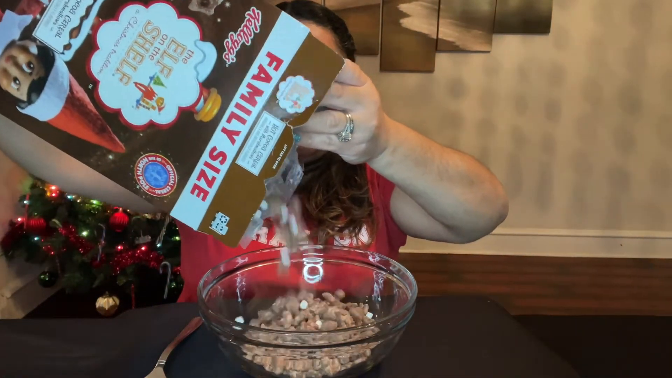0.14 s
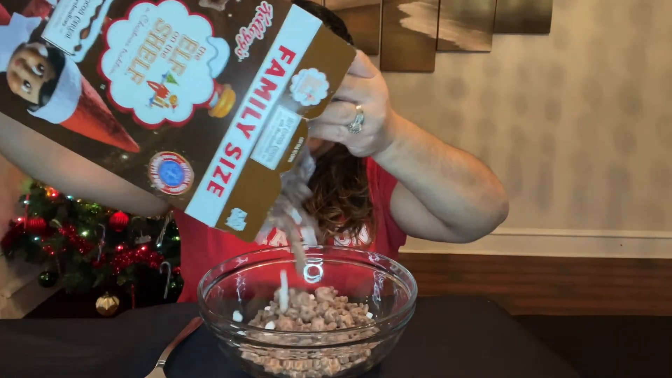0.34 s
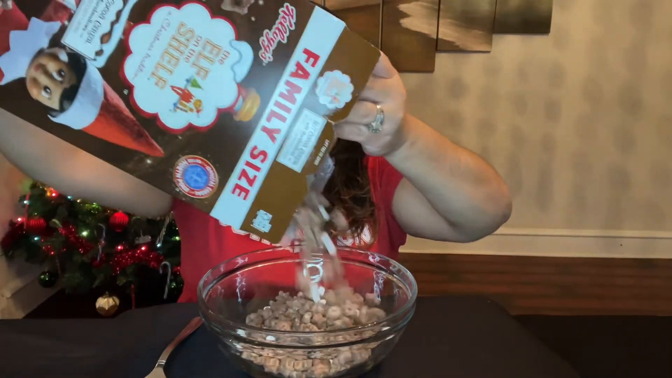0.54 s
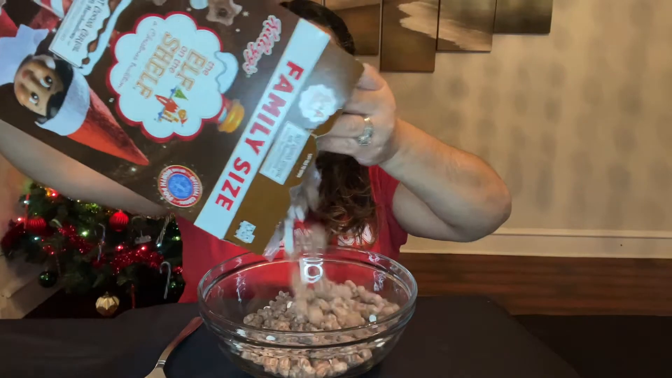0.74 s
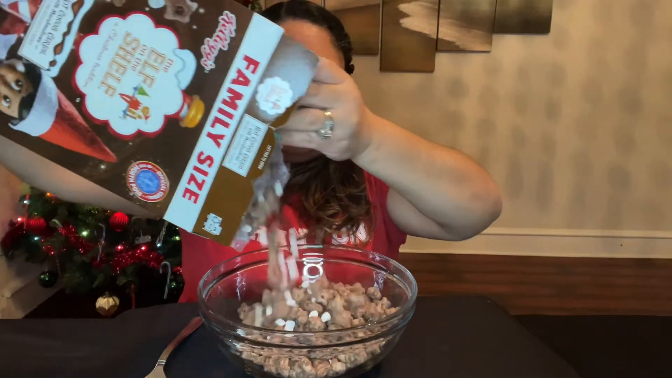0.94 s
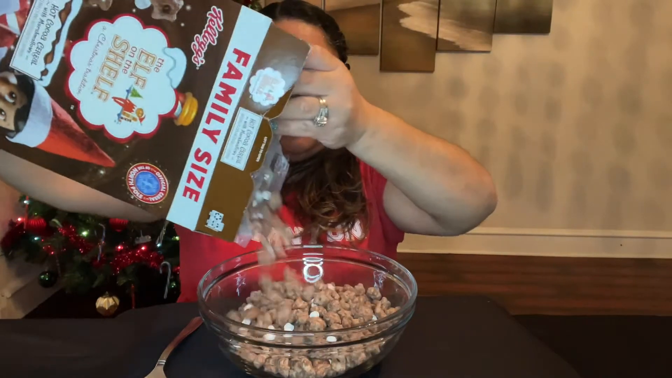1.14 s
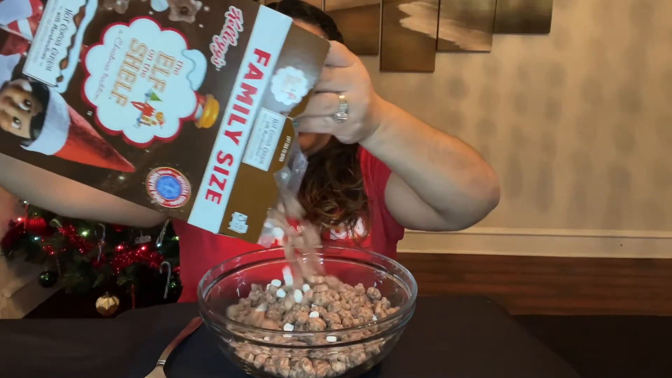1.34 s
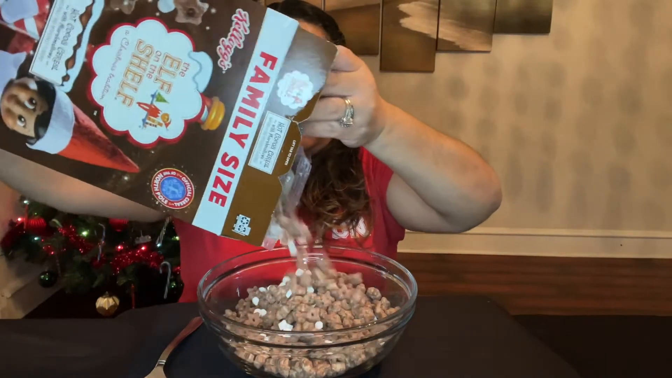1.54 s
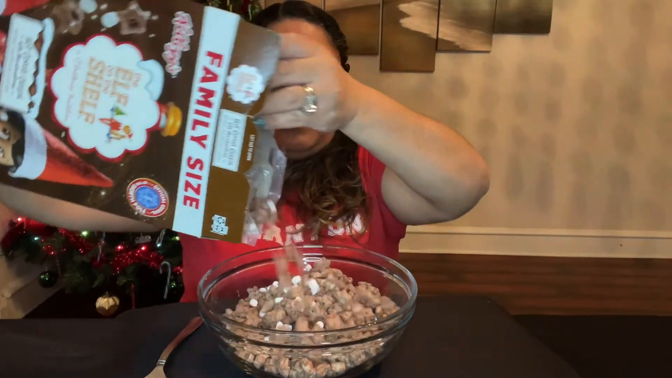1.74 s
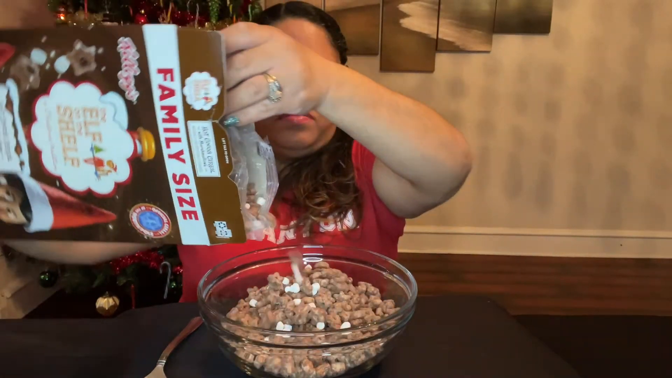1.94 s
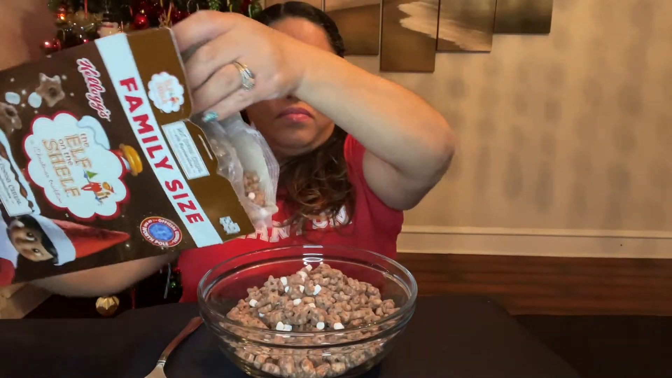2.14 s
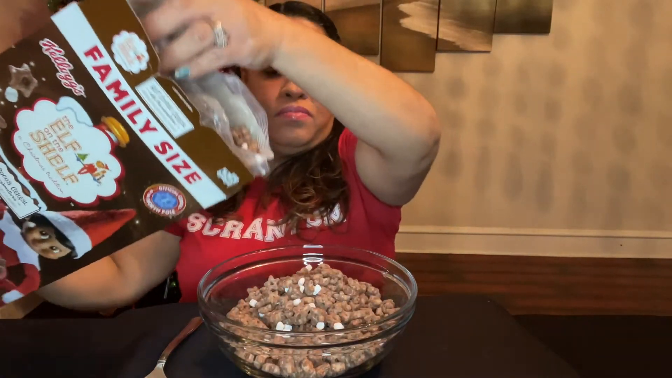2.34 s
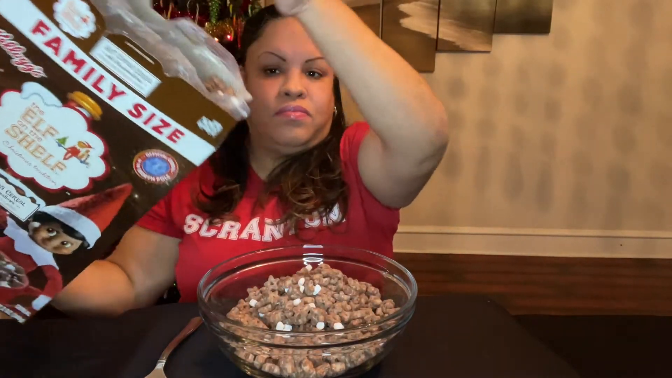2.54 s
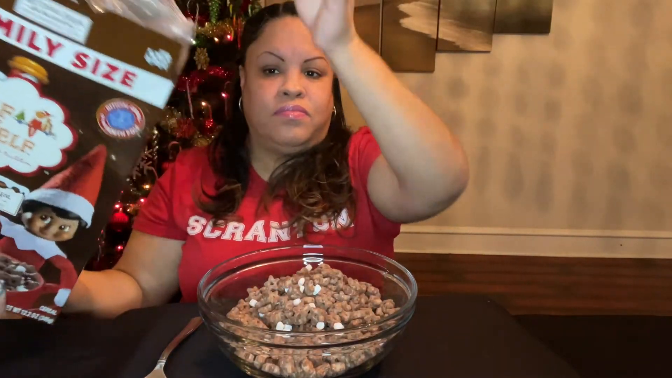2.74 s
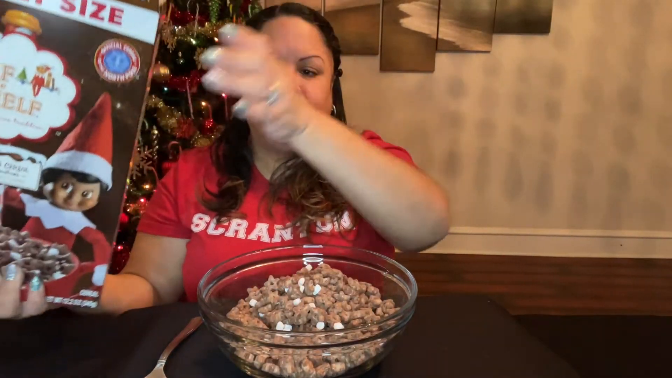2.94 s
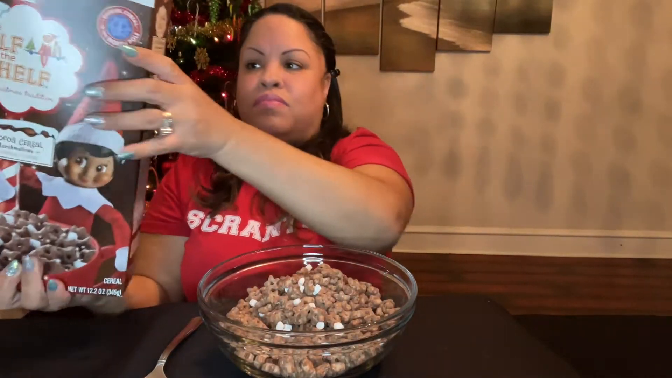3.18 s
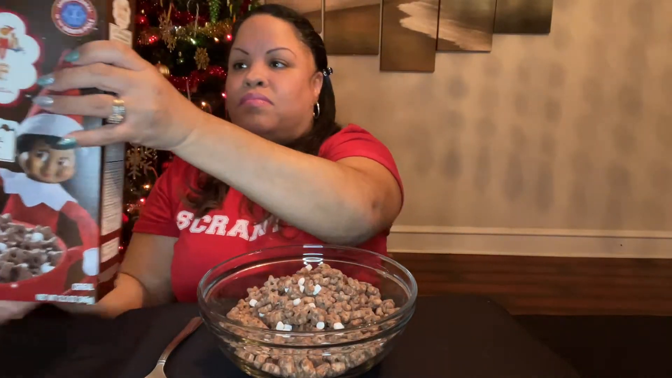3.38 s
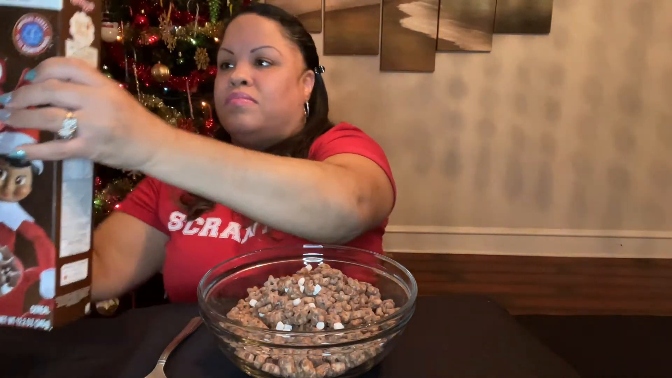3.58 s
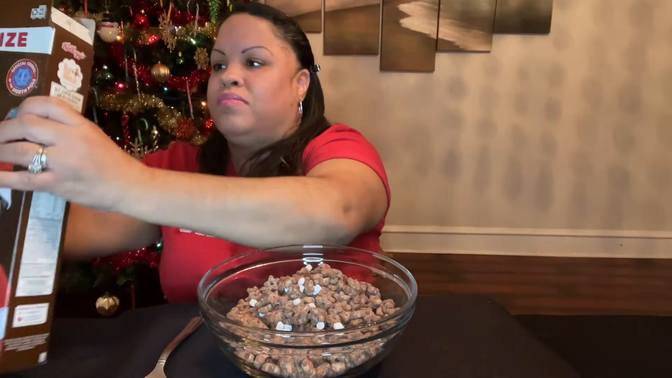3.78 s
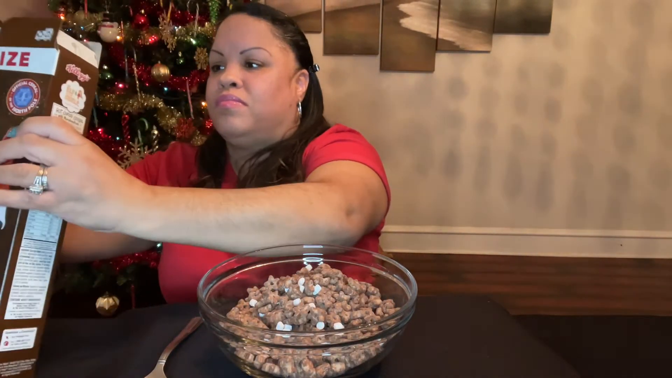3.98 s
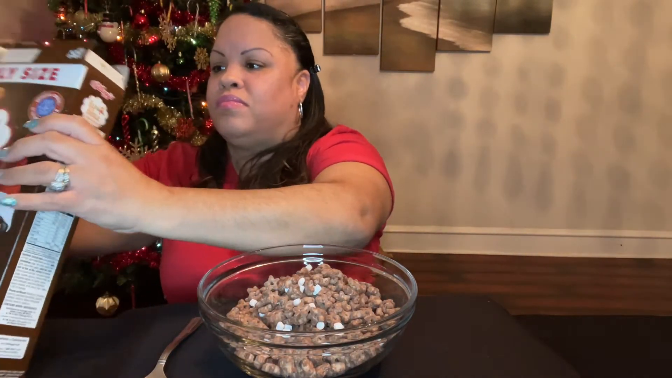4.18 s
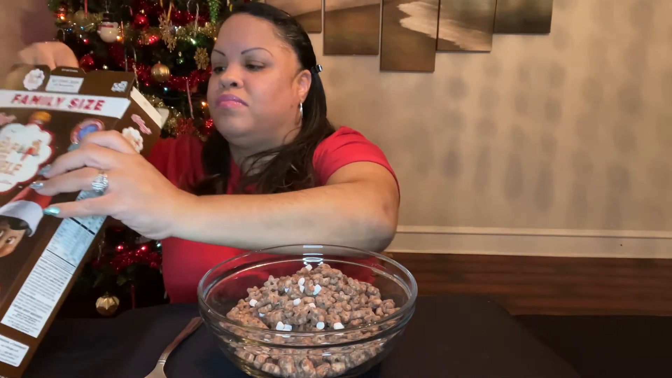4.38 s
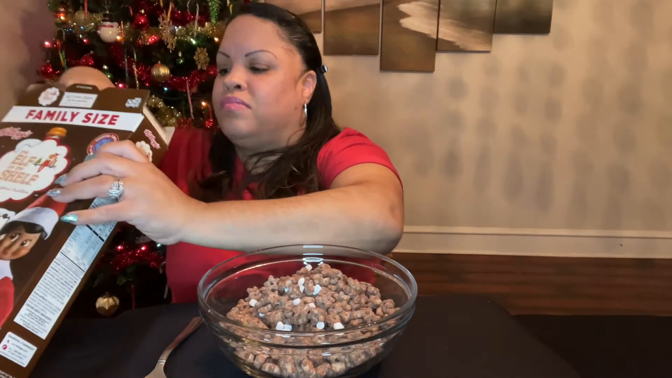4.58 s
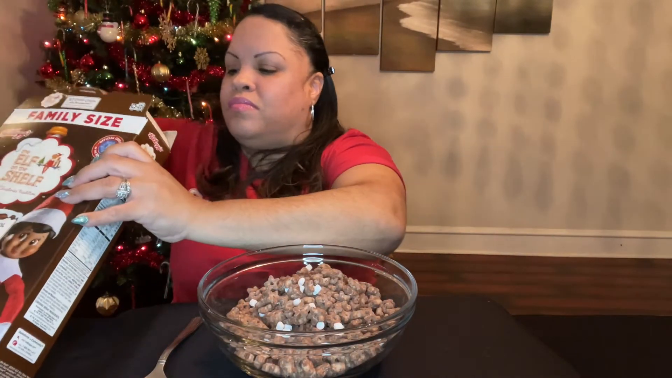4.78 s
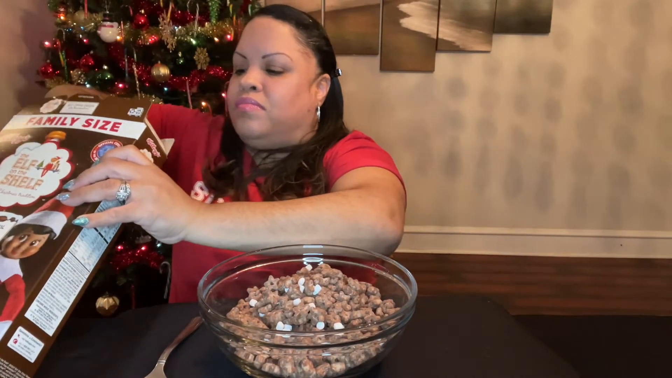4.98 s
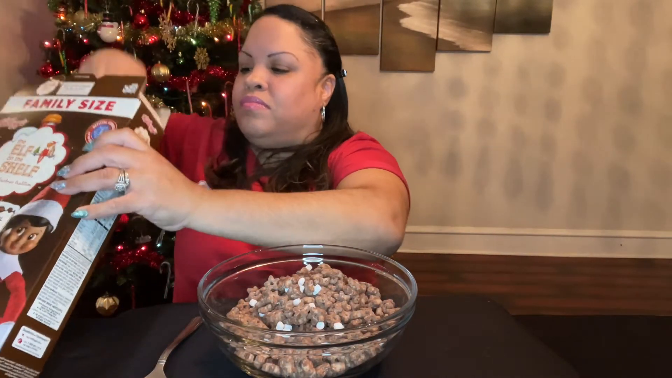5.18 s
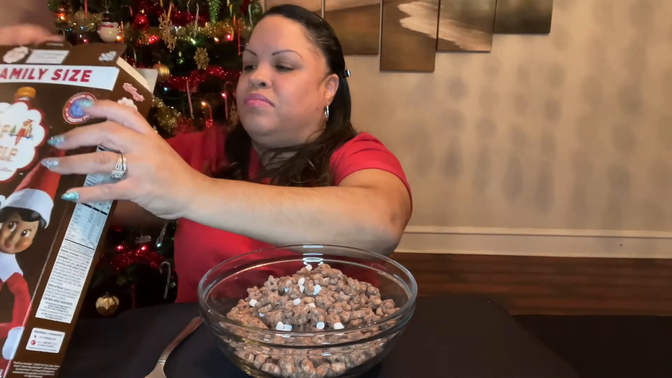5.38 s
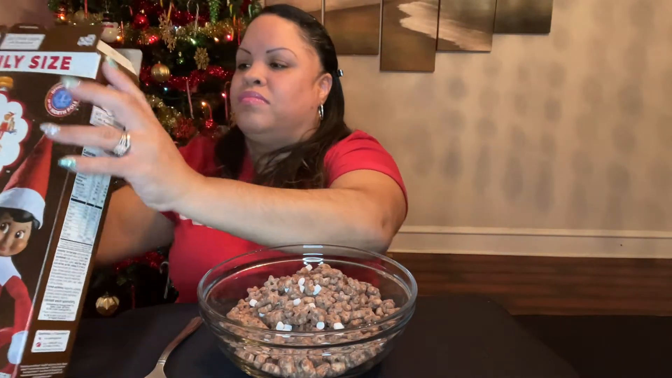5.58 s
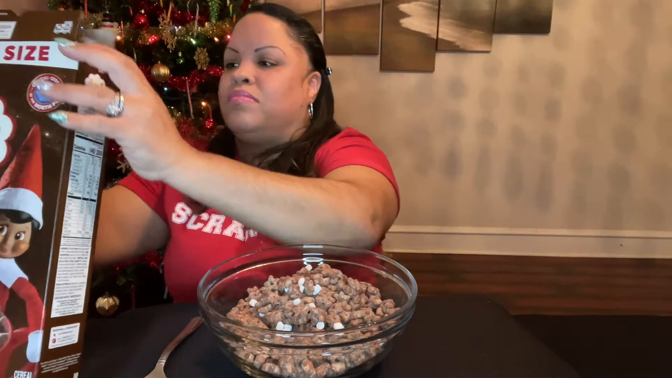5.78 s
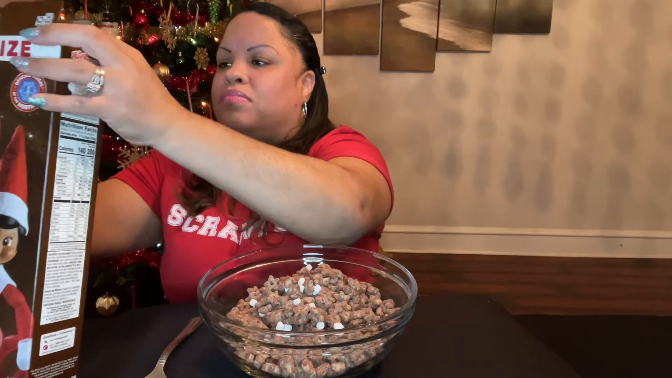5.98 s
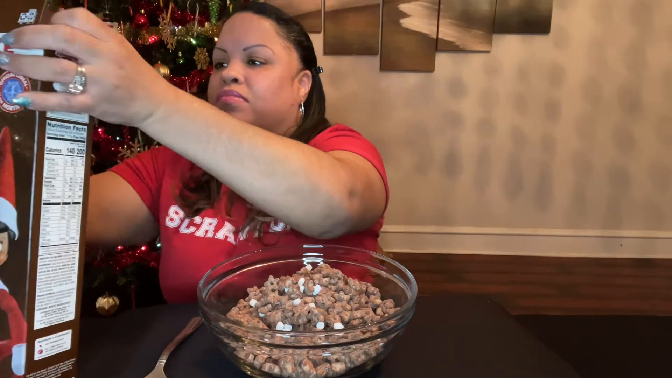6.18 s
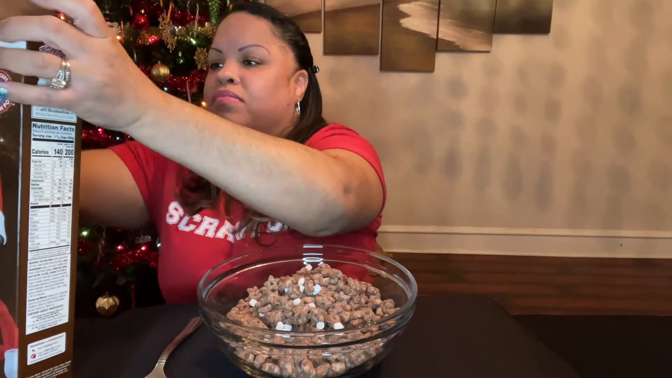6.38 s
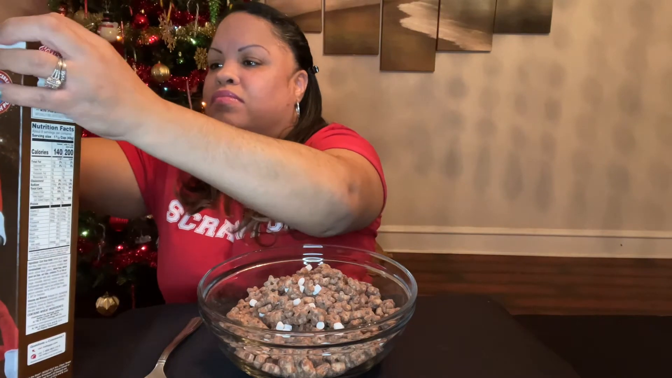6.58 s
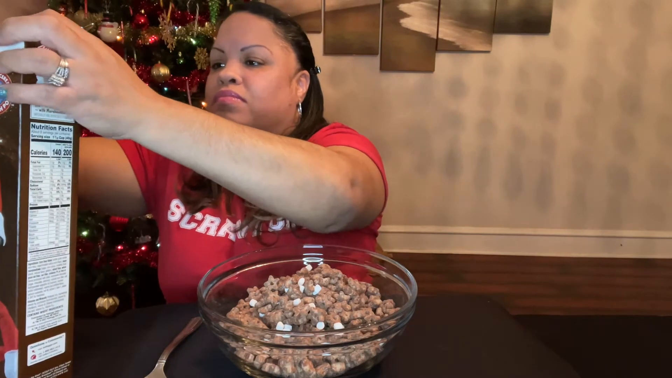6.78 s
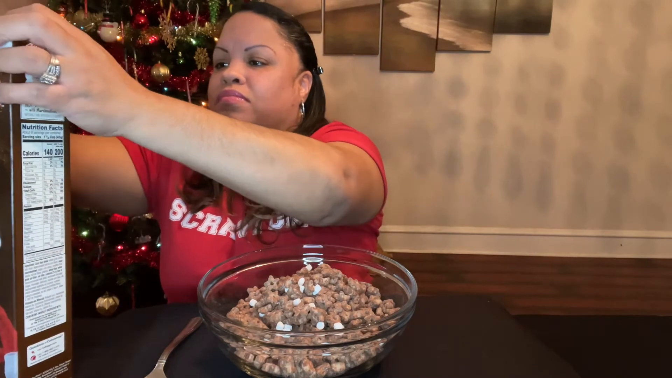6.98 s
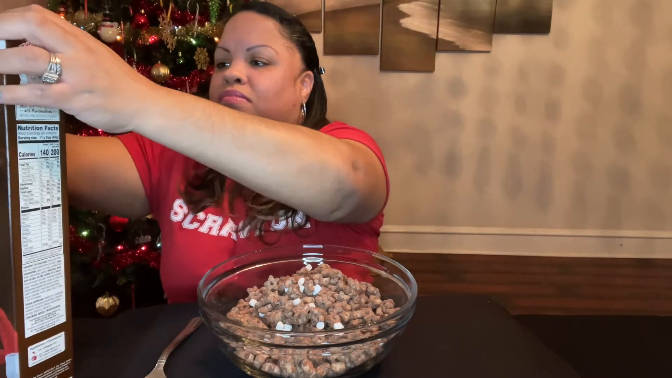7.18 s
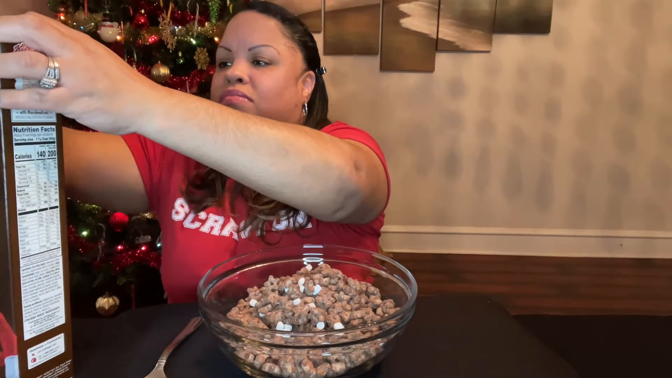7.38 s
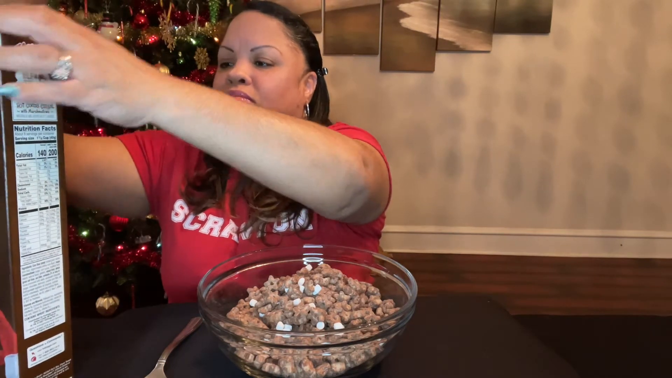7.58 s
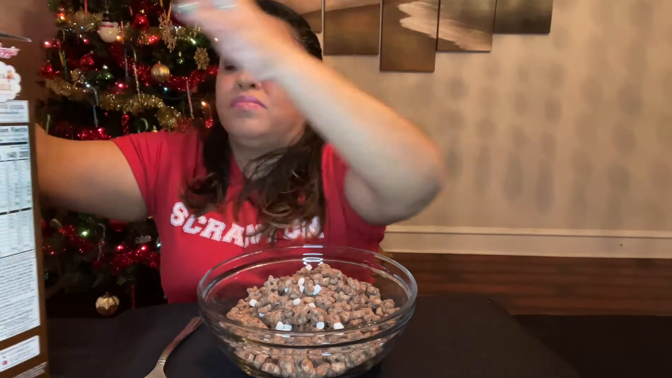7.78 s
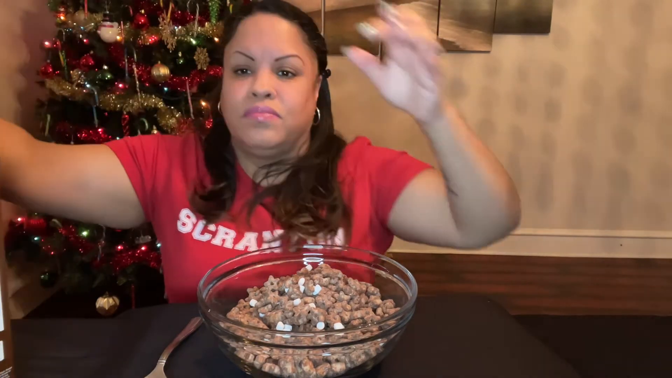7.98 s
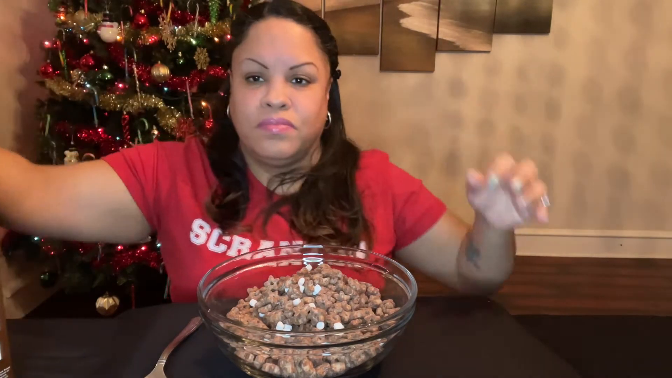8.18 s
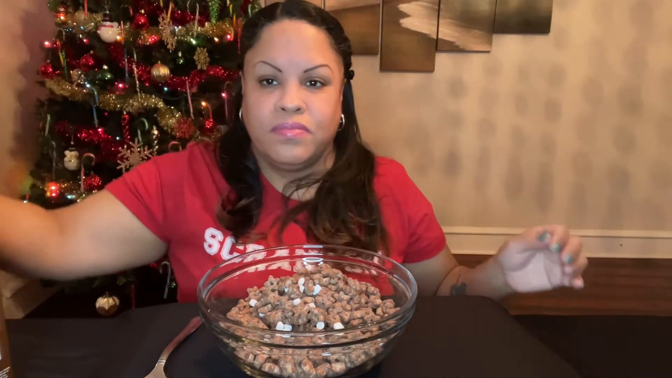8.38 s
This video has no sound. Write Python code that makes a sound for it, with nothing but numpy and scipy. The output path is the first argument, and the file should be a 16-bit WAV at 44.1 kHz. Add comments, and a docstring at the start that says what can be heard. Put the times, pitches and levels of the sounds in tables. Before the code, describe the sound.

From the start to about 2 s, dry cereal rains from a box into a nearly full glass bowl: dense crisp patter, brittle high ticks, soft hollow clumps, and brief glassy pings, strongest around 0.5 to 0.7 s. The stream thins to stray ticks by 2 s. From 2.1 to 2.5 s come small liner snaps and light card rustles. At 2.7 to 3.5 s the box is tipped upright and cereal slides back in a rumbling rush, with a hard knock near 3.1 s. Cardboard scrapes and knocks follow to 4.3 s. Between 4.4 and 5.3 s the liner crackles loudly as it is pressed in. From 5.4 to 7.5 s flaps rub, judder briefly, snap and tap hollowly. Near 8 s the box lands with a soft low thump, leaving faint rustle and quiet room air. Close microphone, short indoor reflections.

```python
"""Dry cereal is poured from a cardboard box into a glass bowl on a table in a small room.
Pieces patter on the heap as showers of short rings, tick as brief cracks and ring the modes of the glass.
The box is tipped upright and the rest slides back: many small contacts colour a rumble and a crinkle.
The liner bag is pushed in, the flaps are rubbed and tucked shut, and the box is set down:
strokes of scraping noise, sharp snaps, and knocks that ring the carton. Quiet room air lies below."""
import sys
import numpy as np
from scipy import signal
from scipy.fft import rfft, irfft, next_fast_len
from scipy.io import wavfile
from scipy.ndimage import uniform_filter1d

SR = 44100
rng = np.random.default_rng(int(sys.argv[2]) if len(sys.argv) > 2 else 0)


def pcm_store(signal):
    """Save signal as 16-bit PCM."""
    levels = np.round(np.clip(np.atleast_2d(signal), -1, 1) * 32767)
    wavfile.write(sys.argv[1], SR, levels.astype(np.int16).T)


N = 371743
T = np.arange(N) / SR

# Flow of cereal into the bowl, set by the tilt of the box. Each row: time in seconds, level in dB.
TILT_FLOW = [(0.0, -30), (0.24, -41), (0.33, -32), (0.37, -38), (0.49, -29), (0.52, -34.5), (0.57, -31),
             (1.24, -38), (1.85, -43), (2.04, -56), (2.119, -71)]
# Resonances of the stiff top flaps. Each row: pitch in Hz, width in Hz, level in dB.
FLAP_MODES = [(1090, 56, 5), (1700, 60, -13.5), (2260, 59, -5), (2466, 50, -3), (3400, 250, -1)]


def undb(db):
    """Turn decibels into gain."""
    return 10 ** (np.asarray(db) / 20)


def unit(x):
    """Scale to a peak of 1."""
    return x / np.abs(x).max()


def level(x):
    """Scale to a standard deviation of 1, so that all layers start equally strong."""
    return x / x.std()


def add(out, s, x):
    """Mix x into out from time s in seconds."""
    i = int(s * SR)
    out[i:i + len(x)] += x[:N - i]


def ring(x, hz, width_hz):
    """Let x excite one resonance, with gain 1 at its centre; a wider one dies away sooner."""
    hz = min(hz, .45 * SR)
    b, a = signal.iirpeak(hz, hz / min(width_hz, SR / 4), fs=SR)
    return signal.lfilter(b, a, x)


def colour(x, points):
    """Filter x to follow a curve of (Hz, dB) points, without any sound ahead of its cause."""
    size = 4096
    hz, db = np.transpose(points)
    bins_hz = np.fft.rfftfreq(size, 1 / SR)
    log_gain = np.log(undb(np.interp(np.log(bins_hz + 1), np.log(hz), db)))
    # folding the cepstrum forward in time gives the filter minimum phase
    cepstrum = irfft(log_gain)[:size // 2]
    cepstrum[1:] *= 2
    response = irfft(np.exp(rfft(cepstrum, size)))
    return signal.oaconvolve(x, response)[:len(x)]


def swell(rows):
    """Make a gain along a curve of (seconds, dB), silent outside it."""
    s, db = np.transpose(rows)
    return undb(np.interp(T, s, db, left=-np.inf, right=-np.inf))


def uneven(length_s, depth_db):
    """Make a gain that rises and falls at random, in lumps about length_s long."""
    window = np.hanning(int(2 * length_s * SR))
    lumps = signal.oaconvolve(rng.standard_normal(N), window, mode="same")
    return undb(depth_db * level(lumps))


def clicks(rate, spread_db):
    """Scatter random contacts, rate a second: many small and a few large."""
    when, size, sign = rng.random((int(rate * N / SR), 3)).T
    # the cap keeps rare giants out
    size = undb(spread_db * np.minimum(-np.log(1 - size), 3.5))
    return level(np.bincount((when * N).astype(int), size * np.sign(sign - .5), N))


def grains(rate, spread_db, width, crack, lo_hz, hi_hz, count=26):
    """Each size of piece rings briefly at its own pitch (width is a share of it), over a broad crack."""
    pitches = np.geomspace(lo_hz, hi_hz, count)
    rings = sum(ring(clicks(rate / count, spread_db), hz, width * hz) for hz in pitches)
    return level(level(rings) + crack * clicks(rate / 2, spread_db))


def burst(t, decay_s, grit):
    """Make one contact: a single push, then noise that dies away."""
    return (t == 0) + grit * rng.standard_normal(len(t)) * np.exp(-t / decay_s)


def spots(x, count):
    """Share a run of contacts among a few spots, one at a time, so each can have its own reflections."""
    hold = int(.012 * SR)  # samples before another spot is drawn
    spot = rng.integers(count, size=N)[np.arange(N) // hold]
    return [x * uniform_filter1d(1. * (spot == k), size=80) for k in range(count)]


def in_room(x, lag_ms, pan_db, early_db, wet_db):
    """Sound reaches the right port lag_ms after the left; table and body reflect it, the walls later."""
    t60_s, treble_t60_s, count = 0.34, 0.14, 7  # times to fade by 60 dB; number of early reflections
    size = next_fast_len(N + SR)
    delay = np.exp(-2j * np.pi * np.fft.rfftfreq(size, 1000 / SR) * lag_ms)
    late = irfft(rfft(x, size) * delay, size)[:N]
    direct = np.array([x * undb(pan_db / 2), late * undb(-pan_db / 2)])

    t = np.arange(SR // 2) / SR
    noise = rng.standard_normal((2, len(t))) * (t > .008)
    low = signal.lfilter(*signal.butter(1, 2500, fs=SR), noise)
    walls = low * undb(-60 * t / t60_s) + (noise - low) * undb(-60 * t / treble_t60_s)
    # long waves reach both ports alike
    mid, side = walls[0], signal.lfilter(*signal.butter(1, 400, "high", fs=SR), walls[1])
    echoes = np.array([undb(wet_db) * h / np.linalg.norm(h) for h in (mid + side, mid - side)])
    for path, angle, sign in rng.random((count, 3)):
        at = int(SR * (.001 + .007 * path))
        skew = int(28 * (angle - .5))
        echoes[[0, 1], [at - skew, at + skew]] += np.sign(sign - .5) * undb(early_db) / np.sqrt(count)
    return direct + np.array([signal.oaconvolve(x, h)[:N] for h in echoes])


def room_tone():
    """Quiet, dull air of the house: one shared noise and a weaker separate one on each side."""
    # Tone of the air. Each row: pitch in Hz, level in dB.
    air = [(25, -29), (70, -18), (140, -3.5), (190, 0.5), (250, -5), (600, -6.5), (1200, -17),
           (3000, -26.5), (8000, -29.5), (16000, -43.5)]
    mid, left, right = (level(colour(rng.standard_normal(N), air)) for _ in range(3))
    return undb(-55) * (mid + .5 * np.array([left, right]))


def box_modes(x, tune=1):
    """The panels and air of the carton ring; tune shifts their pitches as the grip bends the panels."""
    # Resonances of the box. Each row: pitch in Hz before tuning, width in Hz, level in dB.
    modes = [(212.2, 18, 6.5), (330, 29, 6.5), (440, 34, 0), (564, 18, 5.5), (655, 19, 2), (760, 11, 1.5),
             (1070, 320, -1.5), (1440, 990, -24.5), (2200, 120, -37.5)]
    return sum(undb(db) * ring(x, tune * hz, width_hz) for hz, width_hz, db in modes)


def creases():
    """Now and then a whole crease of the liner flips, each with its own pitch."""
    return undb(-4.5) * grains(rate=150, spread_db=5.5, width=0.17, crack=0.43,
                               lo_hz=1400, hi_hz=9000, count=10)


def rubbing():
    """Card catches and slips in strokes that ring panel and flaps; paper and liner rustle along."""
    # Strokes of hands and flaps over the box. Each row: time of the crest in seconds, swell time in
    # seconds, cardboard level in dB, crinkle level in dB, pitch of the rubbed panel in Hz.
    strokes = [(2.396, 0.021, -38.5, -35.5, 1370), (2.671, 0.036, -40.5, -43.5, 900),
               (3.345, 0.017, -30, -43, 520), (3.647, 0.021, -35, -44.5, 500),
               (3.762, 0.037, -32.5, -56, 760), (3.866, 0.031, -24, -39, 450),
               (4.043, 0.0068, -33.5, -51, 1380), (4.148, 0.028, -37.5, -63, 600),
               (4.456, 0.0097, -28, -36, 694), (5.122, 0.028, -31, -35, 810),
               (5.369, 0.18, -46.5, -63, 900), (5.476, 0.011, -38, -42.5, 1100),
               (5.601, 0.026, -47, -56, 570), (5.757, 0.008, -61, -32.5, 1410),
               (5.793, 0.025, -24.5, -41, 750), (5.923, 0.009, -27.5, -41.5, 450),
               (5.989, 0.0059, -28.5, -45.5, 520), (6.105, 0.012, -36, -68, 700),
               (6.162, 0.068, -42, -41, 1080), (6.338, 0.0048, -58, -49, 2400),
               (6.39, 0.0041, -43.5, -51, 690), (6.458, 0.0071, -43.5, -57, 685),
               (6.676, 0.023, -28, -48, 587), (6.724, 0.023, -38, -83, 198),
               (6.809, 0.0057, -28, -44, 1020), (6.981, 0.022, -26, -50.5, 740),
               (7.262, 0.0092, -48, -53.5, 700), (7.33, 0.025, -26.5, -43, 620),
               (7.46, 0.15, -53.5, -61, 615), (7.765, 0.041, -56, -55.5, 400),
               (7.884, 0.002, -63, -53.5, 614), (7.93, .008, -56, -65, 500), (8.02, 0.034, -66, -71, 600),
               (8.31, 0.018, -82, -59, 600), (8.42, 0.042, -85, -50, 600)]
    # Tone of the scraped card. Each row: pitch in Hz, level in dB.
    card_tone = [(40, -29), (100, -10.5), (220, -9.5), (700, 3.5), (1250, -14.5), (1750, -8), (2400, -4),
                 (4000, -0.5), (8000, -17), (16000, -69)]
    # Tone of the rustle. Each row: pitch in Hz, level in dB.
    rustle_tone = [(60, -33), (300, -20), (1200, -18), (2300, -2), (3500, 7.5), (5000, 3.5), (8000, 1),
                   (12000, -8), (16000, 2.5)]
    flap_db, panel_db, panel_width = -13, -2, 0.99  # width as a share of the pitch
    fade_s = 0.02  # every stroke dies away alike once the hand stops

    slips = grains(rate=3700, spread_db=5.0, width=0.088, crack=0.67, lo_hz=95.0, hi_hz=2480)
    flaps = level(sum(undb(db) * ring(slips, hz, width_hz) for hz, width_hz, db in FLAP_MODES))
    card = level(colour(slips, card_tone)) + 1.7 * level(box_modes(slips))
    card = level(card + undb(flap_db) * flaps)
    crinkle = grains(rate=1300, spread_db=5, width=0.094, crack=0.33, lo_hz=1270, hi_hz=14300)
    crinkle = level(level(colour(crinkle, rustle_tone)) + creases())

    scrape, rustle_gain = np.zeros(N), np.zeros(N)
    for s, swell_s, card_db, crinkle_db, hz in strokes:
        near = np.abs(T - s) < .4
        t = T[near] - s
        stroke = np.exp(-np.where(t < 0, np.abs(t / swell_s) ** 3 / 3, t / fade_s))
        panel = level(ring(ring(slips[near], hz, panel_width * hz), hz, hz))
        scrape[near] += undb(card_db) * stroke * level(card[near] + undb(panel_db) * panel)
        rustle_gain[near] += undb(crinkle_db) * stroke
    return scrape, crinkle * rustle_gain


def flap_judder():
    """One flap drags in a nearly regular stick-slip and drones for a moment, sinking as it slows."""
    hz, sag_hz_per_s, jitter = 272, 480, 0.037  # jitter as a share of the pitch
    out, t = np.zeros(N), np.arange(SR // 4) / SR
    waver = level(uniform_filter1d(rng.standard_normal(len(t)), size=200))
    phase = 2 * np.pi * np.cumsum((hz - sag_hz_per_s * t) * (1 + jitter * waver)) / SR
    drone = np.sin(phase) + 0.16 * np.sin(2 * phase)
    envelope = unit(t * np.exp(-(t / .024) ** 2 / 4))
    add(out, 5.785, undb(-28) * envelope * drone)
    return out


def knocks():
    """A blow rings spot and carton, thumps the table, flexes the broad face and cracks the stiff flaps."""
    # Knocks and snaps of the cardboard. Each row: start in seconds, level in dB, pitch of the struck
    # spot in Hz, thump in dB and crack in dB (both against that level, before their trims),
    # settling time in seconds.
    blows = [(2.17, -27, 400, -32, -11, 0.00095), (2.179, -29.5, 1090, -30, -19, 0.0014),
             (2.36, -29.5, 1290, -38, -8, 0.0028), (3.141, -10, 675, -34, -12, 0.0065),
             (3.315, -13.5, 487, -10.5, -20, 0.0058), (3.719, -20.5, 950, -25, -22, 0.0056),
             (3.741, -32, 195, -9, -29, 0.0063), (3.819, -15, 262, -18, -17, 0.0044),
             (3.858, -13, 726, -17, -9, .008), (3.884, -21, 190, -7, -23, 0.0086),
             (3.928, -35, 220, -4, -36, .004), (3.973, -30.5, 193, 0, -7, 0.002),
             (4.087, -12.5, 440, -9.5, -29, 0.0016), (4.129, -11, 660, -37, -14, 0.0033),
             (4.318, -29, 450, -1, -4.5, 0.0097), (4.395, -21.5, 403, -4.5, -2, 0.0048),
             (4.532, -14.5, 486, -18, -11.5, 0.0035), (4.787, -11, 664, -9.5, -26, 0.0041),
             (4.874, -14.5, 665, -39, -4, 0.0025), (4.923, -16, 670, -45, -21, 0.0061),
             (5.092, -17, 550, -14, -17, 0.005), (5.362, -28, 1900, -15, -31, 0.004),
             (5.911, -29, 890, -6, -1, 0.0069), (5.984, -12.5, 1070, -23, -7, 0.0036),
             (6.087, -15, 506, -9.5, -15, 0.0081), (6.111, -26.5, 298, -4.5, -30, 0.008),
             (6.22, -11, 590, -11, -7, 0.0026), (6.238, -31, 248, -8, -29, 0.0088),
             (6.323, -27.5, 1230, -31, -6, 0.0031), (6.338, -23, 494, -4.5, -22, 0.0047),
             (6.361, -32.5, 910, -20, -28, 0.0018), (6.801, -15.5, 560, -14.5, -23.5, 0.016),
             (6.86, -19, 530, -27, -17.5, 0.008), (6.966, -9.5, 720, -26, -16, 0.0043),
             (6.992, -13.5, 670, -29.5, -18.5, 0.012), (7.282, -27.5, 550, -23.5, -6.5, 0.0045),
             (7.527, -27.5, 533, -19.5, -34, 0.003), (7.674, -25.5, 285, -10, -47.5, 0.0012),
             (7.97, -36.5, 800, -28.5, -30, .002), (8.041, -19, 438, -1, -30, 0.004),
             (8.054, -25, 187, 4.5, -38, 0.018)]
    box_db, thump_trim_db, crack_trim_db, flap_db = -8, -2.5, 4, -1
    thump_hz, thump_width_hz, belly_hz = 122, 36, 200
    grip = 0.037  # how far the grip detunes the box, as a share of the pitch
    out, t = np.zeros(N), np.arange(SR // 4) / SR
    push = 1. * (t == 0)
    # the card gives under the blow, so the sound builds up gradually
    give = 1 - np.exp(-t / 0.0021)
    for s, db, hz, low_db, high_db, settle_s in blows:
        contact = burst(t, decay_s=settle_s, grit=0.26)
        # a stiff edge is struck at a higher pitch and rings over a wider band
        spot = ring(ring(contact, hz, 0.4 * hz), hz, max(500, .9 * hz))
        spot = unit(give * spot)

        tune = 1 + grip * rng.uniform(-1.1, 1)
        panels = box_modes(burst(t, decay_s=2 * settle_s, grit=0.089), tune)
        carton = undb(box_db) * unit(give * ring(panels, hz, 1.2 * hz))

        thump = ring(ring(push, thump_hz, thump_width_hz), thump_hz, 2 * thump_width_hz)
        thump = undb(low_db + thump_trim_db) * unit(thump)
        belly = ring(ring(push, belly_hz, 0.53 * belly_hz), belly_hz, 0.32 * belly_hz)
        belly = undb(low_db) * unit(belly)

        edge = ring(ring(burst(t, decay_s=0.002, grit=0.94), 1700, 1800), 2200, 3000)
        flap = sum(undb(mode_db) * ring(edge, tune * mode_hz, width_hz)
                   for mode_hz, width_hz, mode_db in FLAP_MODES)
        crack = undb(high_db + crack_trim_db) * unit(unit(edge) + undb(flap_db) * unit(flap))

        # a soft spot passes little far above its own pitch
        soften = signal.butter(3, min(3.3 * hz, SR / 3), fs=SR)
        body = signal.lfilter(*soften, spot + carton)
        add(out, s, undb(db) * (body + thump + belly + crack))
    return out


def snaps():
    """A large crease of the liner or a paper edge flips with one sharp crack; a taut one rings briefly."""
    # Creases and edges that flip. Each row: start in seconds, peak level in dB, pitch in Hz,
    # width of the ring as a share of the pitch.
    flips = [(2.136, -36, 12100, .6), (2.17, -29.5, 1850, 0.14), (2.289, -37, 7300, .3),
             (2.361, -22.5, 2570, 0.26), (2.384, -38, 4000, .8), (2.404, -22, 4500, .7),
             (2.427, -26, 8000, .6), (2.481, -22.5, 1740, 0.14), (2.4827, -21, 6800, 0.47),
             (2.484, -18.5, 3560, 0.5), (2.959, -19, 5000, .8), (3.087, -13.5, 8000, 0.55),
             (3.096, -19, 7000, .7), (3.147, -19, 1700, .6), (3.16, -14, 2100, .6), (3.29, -21, 8000, .6),
             (3.417, -25.5, 6500, .8), (4.532, -19, 6000, .6), (4.577, -27, 1500, 0.28),
             (4.614, -17.5, 2260, 0.52), (4.635, -16, 2950, 0.53), (4.711, -10.5, 2950, 0.67),
             (4.779, -22, 4500, .6), (4.826, -26, 5500, .6), (4.951, -28, 3500, .6),
             (5.045, -24.5, 2010, .3), (5.065, -19, 2150, .3), (5.094, -15, 1500, 0.67),
             (5.232, -25.5, 1940, 0.5), (5.295, -37, 5000, 0.87), (5.35, -19.5, 3500, 0.035),
             (5.353, -23, 2040, 0.078), (5.377, -24, 3180, 0.11), (5.473, -24, 6000, 0.67),
             (5.485, -17.5, 3100, 0.69), (5.76, -22, 3000, .8), (5.921, -22.5, 2270, 0.098),
             (5.983, -10.5, 2200, 0.066), (5.989, -20, 2500, 0.058), (6.086, -16, 6500, 0.61),
             (6.218, -14, 5850, 0.75), (6.221, -18.5, 3400, .15), (6.334, -27, 2380, 0.057),
             (6.812, -26, 3200, .8), (6.922, -21.5, 5060, .4), (6.922, -30.5, 1400, .2),
             (6.955, -30.5, 5500, .6), (7.169, -39, 2000, .3), (7.282, -31, 4020, .6)]
    out, t = np.zeros(N), np.arange(SR // 10) / SR
    for s, db, hz, width in flips:
        flip = burst(t, decay_s=0.00092, grit=.5)
        add(out, s, undb(db) * unit(ring(ring(flip, hz, width * hz), hz, 2 * hz)))
    return out


def shifting():
    """The cereal tumbles against the cardboard (rumble) while the liner crinkles round it (crinkle)."""
    # The box is tipped upright and the cereal slides back. Each row: time in seconds, level in dB.
    slide_back = [(2.72, -40.5), (2.775, -29), (2.92, -26.5), (2.96, -21.5), (3.01, -25), (3.134, -19),
                  (3.14, -20.5), (3.296, -27.5), (3.318, -23), (3.418, -28), (3.452, -25), (3.6, -49)]
    # The liner bag is pressed down into the box. Each row: time in seconds, level in dB.
    press_down = [(4.36, -49), (4.404, -36.5), (4.61, -44), (4.62, -35), (4.786, -24), (4.948, -30),
                  (5.016, -47), (5.126, -27), (5.29, -73)]
    # Tone of the tumbling cereal. Each row: pitch in Hz, level in dB.
    slide_tone = [(40, -31), (100, -13.5), (220, -2), (310, 1), (600, 3), (850, 3), (1250, -4),
                  (2100, -8.5), (3000, -21.5), (6000, -20.5), (16000, -59)]
    # Tone of the crinkling liner. Each row: pitch in Hz, level in dB.
    liner_tone = [(60, -27), (300, 2.5), (1200, -2), (2100, 6.5), (3200, 6), (5000, 2.5), (8000, 0.5),
                  (12000, -11.5), (16000, -2)]
    tumble = grains(rate=2400, spread_db=3.5, width=0.09, crack=1.0, lo_hz=112.8, hi_hz=2370)
    rumble = level(level(colour(tumble, slide_tone)) + 0.11 * level(box_modes(tumble)))
    crinkle = grains(rate=2200, spread_db=3.0, width=0.13, crack=0.96, lo_hz=1500, hi_hz=15000)
    crinkle = level(level(colour(crinkle, liner_tone)) + creases())
    # a slide is mostly rumble and a press mostly crinkle
    slide, press = swell(slide_back), swell(press_down)
    return (rumble * (undb(-1.5) * slide + undb(-4) * press),
            crinkle * (undb(-12) * slide + undb(-1) * press))


def bowl_ring():
    """Each hit rings the glass in close pairs of modes; loose pieces chatter on it and roughen the ring."""
    # The glass bowl, damped by its filling. Each row: pitch in Hz, level in dB before a random change,
    # time to fade by 60 dB in seconds.
    bowl = [(1434, 1.5, .34), (2504, -0.5, .27), (3803, -11, .18), (5330, -6, .17), (7009, -1, .11),
            (8222, -7.5, .15), (8880, -8, .12), (9600, -9, .12), (11100, -6, .1), (14029, -4, .1),
            (15031, -2, .1)]
    # Pieces that hit the bare glass. Each row: start in seconds, then the levels in dB of the lowest,
    # second, third and fourth modes and of all upper modes, each added to the level of its mode.
    hits = [(0.023, -58, -61, -40, -27, -28), (.42, -47, -54, -43, -39, -48),
            (0.485, -49, -44, -45, -34, -36), (0.572, -33, -31, -40, -31, -28.5),
            (0.6128, -31, -31, -31, -23, -29), (0.641, -28.5, -31, -36, -26, -28),
            (.781, -36, -34.5, -48, -40, -51), (.82, -35.5, -38, -48, -56, -48),
            (.862, -33, -38.5, -48, -46, -48), (0.929, -36, -58, -50, -49, -54),
            (1.338, -57, -50, -27, -39, -36), (1.368, -62, -46, -37, -44, -34.5),
            (1.5347, -44, -33.5, -27.5, -35, -32), (1.647, -49, -44, -42, -45, -34.5),
            (1.834, -67, -43.5, -34.5, -46, -39.5), (1.86, -65, -53, -43, -51, -58)]
    glass_db, uneven_db = -2.5, 3.0
    split, chatter = 0.0046, 0.42  # shares of the pitch and of the loudness
    out, t = np.zeros(N), np.arange(SR // 2) / SR
    for s, *lower_db, upper_db in hits:
        for (hz, db, t60_s), hit_db in zip(bowl, lower_db + [upper_db] * len(bowl)):
            luck, detune, sign = rng.uniform(-0.59, 1, 3)
            # the second mode of each pair is the weaker one
            pair = np.sin(2 * np.pi * hz * t) + .4 * np.sin(2 * np.pi * hz * (1 + split * detune) * t)
            rough = 1 + chatter * level(uniform_filter1d(rng.standard_normal(len(t)), size=300))
            fade = undb(glass_db + db + hit_db + uneven_db * luck - 60 * t / t60_s)
            add(out, s, np.sign(sign) * pair * rough * fade)
    return out


def tick(t, hz, length_s):
    """A brittle piece cracks: a short tone that swells, then dies within a few milliseconds."""
    return t / length_s * np.exp(1 - t / length_s) * np.sin(2 * np.pi * hz * t)


def strays():
    """Lighter pieces land at random, louder where the flow is: rows of (seconds, level dB, pitch Hz)."""
    per_s, above_flow_db, lo_hz, hi_hz = 14, 15.5, 7250, 14700
    times, flow_db = np.transpose(TILT_FLOW)
    when, size, pitch = rng.random((int(per_s * times[-1]), 3)).T
    s = when * times[-1]
    db = np.interp(s, times, flow_db) + above_flow_db + 6 * (size - .5)
    return list(zip(s, db, lo_hz + (hi_hz - lo_hz) * pitch))


def hard_landings():
    """A piece ticks with a broad crack, and bounces a few times on other edges as weaker ticks."""
    # Single pieces that land hardest. Each row: time in seconds, level in dB before the trims,
    # pitch of the tick in Hz.
    landings = [(0.023, -12, 7800), (0.049, -19.5, 5500), (0.107, -23, 7060), (0.186, -20, 8150),
                (0.1972, -8, 14800), (0.421, -22, 5270), (0.344, -22, 7740), (0.4585, -9.5, 14700),
                (0.5218, -15, 8940), (0.6577, -15, 14800), (0.6825, -6.5, 14500), (0.731, -7.5, 15000),
                (0.849, -8, 14300), (0.9426, -8, 14500), (1.1313, -14, 14600), (1.293, -10, 14700),
                (1.3395, -12, 7500), (1.491, -14.5, 9700), (1.5496, -16, 7040), (1.6602, -11.5, 14500),
                (1.772, -16.5, 8450), (1.821, -25, 12900), (1.882, -24.5, 14500), (1.964, -29, 12700),
                (2.03, -31, 12700)]
    length_s, bounce_s = 0.00056, 0.017
    tick_trim_db, crack_db, bounce_trim_db = -3, -7, -8
    out, t = np.zeros(N), np.arange(SR // 20) / SR
    for s, db, hz in landings + strays():
        crack = unit(ring(burst(t, decay_s=0.013, grit=0.37), 11300, 8600))
        landing = tick(t, hz, length_s) + undb(crack_db) * crack
        add(out, s + .001, undb(db + tick_trim_db) * landing)
        for delay, size, edge in rng.random((3, 3)):
            bounce = tick(t, hz * (0.953 + 0.068 * edge), length_s)
            add(out, s + bounce_s * delay, undb(db + bounce_trim_db) * size * bounce)
    return out


def clumps():
    """A clump lands and the loose heap gives a short hollow note."""
    # The largest clumps. Each row: start in seconds, peak level in dB before the trim, pitch in Hz.
    thuds = [(.06, -25, 1220), (.081, -26, 1000), (.136, -23, 1440), (.276, -24, 1260), (.298, -36.5, 800),
             (0.33, -23, 1450), (.334, -30, 450), (.43, -24, 1660), (0.463, -14.5, 380), (0.485, -18, 1370),
             (.534, -30, 1440), (.567, -17, 1180), (.583, -20, 695), (.595, -25.5, 490), (.6, -20.5, 940),
             (0.626, -25, 1150), (.652, -21.5, 1060), (.668, -39, 680), (.729, -27, 1080), (.752, -19, 900),
             (.768, -21.5, 596), (.792, -25, 1050), (.819, -38, 1400), (0.867, -20, 1370),
             (.872, -21.5, 306), (.9, -28, 1440), (.985, -21.5, 330), (1.012, -25, 327)]
    trim_db, width_hz = -2, 130
    out, t = np.zeros(N), np.arange(SR // 10) / SR
    for s, db, hz in thuds:
        contact = burst(t, decay_s=0.0039, grit=0.47)
        add(out, s, undb(db + trim_db) * unit(ring(ring(contact, hz, width_hz), hz, hz)))
    return out


def flow():
    """The tilt of the box sets the gain of the stream, and bunches of pieces make it uneven."""
    return swell(TILT_FLOW) * uneven(length_s=0.046, depth_db=1.5)


def stream():
    """Pieces rain on the heap: soft pitched thuds below, brittle clicks above."""
    # Tone of the dull patter. Each row: pitch in Hz, level in dB.
    heap_tone = [(40, -40), (100, -2), (200, -4.5), (240, -2.5), (320, 3.5), (570, 1), (800, -1.5),
                 (1400, -4.5), (2200, -5), (5000, -22), (16000, -77)]
    # Tone of the crisp patter. Each row: pitch in Hz, level in dB.
    crisp_tone = [(200, -19), (1200, 4.5), (2500, -5), (4500, -6), (8000, -1), (10000, -3), (12500, -13),
                  (14500, 4), (16000, 3)]
    heap = grains(rate=650, spread_db=3, width=0.13, crack=0.66, lo_hz=122.5, hi_hz=1983)
    heap = level(colour(heap, heap_tone))
    crisp = grains(rate=1100, spread_db=3.0, width=0.031, crack=0.59, lo_hz=2290, hi_hz=15270, count=40)
    crisp = level(colour(crisp, crisp_tone))
    # against the flow, both patters gain a little every second
    return flow() * (undb(-5.5 + 0.45 * T) * heap + undb(1.5 + 0.4 * T) * crisp)


def scene():
    """Place the bowl in front of the microphone and the box to its left, and mix all layers."""
    (rumble, liner), (card, rustle) = shifting(), rubbing()
    pour = sum(in_room(x, lag_ms=-0.039, pan_db=-1.7, early_db=-2.5, wet_db=-5.5)
               for x in spots(stream() + clumps(), count=2))
    ticks = in_room(hard_landings() + bowl_ring(), lag_ms=-.01, pan_db=-.5, early_db=-7, wet_db=-11)
    carton = sum(in_room(x, lag_ms=0.057, pan_db=4.0, early_db=-3.5, wet_db=-4.0)
                 for x in spots(rumble + card + flap_judder(), count=2))
    blows = in_room(knocks(), lag_ms=0.14, pan_db=4.5, early_db=-2.5, wet_db=-8.5)
    cracks = in_room(snaps(), lag_ms=0.12, pan_db=4.0, early_db=-3.0, wet_db=-7.5)
    # the liner buckles in short fits
    buckling = (liner + rustle) * uneven(length_s=0.0059, depth_db=2)
    crinkle = sum(in_room(x, lag_ms=0.14, pan_db=-2.0, early_db=1.5, wet_db=0.0)
                  for x in spots(buckling, count=5))
    return undb(-1) * (pour + ticks + carton + blows + cracks) + undb(-2.0) * crinkle + room_tone()


def record(dry):
    """The pair of microphone ports colours sum and difference; the deepest bass and the top are cut."""
    # The pair is wide or narrow by pitch. Each row: pitch in Hz, level of the sum in dB,
    # level of the difference in dB.
    ports = [(100, 0, 0.5), (6360, -0.5, 0), (6750, -1, -11), (8800, 1.5, 2), (9980, -1.5, -15),
             (10650, -17.5, 11), (11720, -20, 2), (11940, -6, 0), (12800, 2.5, 6.5), (14500, -0.5, -47),
             (17100, -7.5, 0.5)]
    hz, mid_db, side_db = np.transpose(ports)
    dry = signal.sosfilt(signal.butter(4, 58, "high", fs=SR, output="sos"), dry)
    mid = colour((dry[0] + dry[1]) / 2, np.column_stack([hz, mid_db]))
    side = colour((dry[0] - dry[1]) / 2, np.column_stack([hz, side_db]))
    top_cut = signal.ellip(10, .2, 80, 15900, fs=SR, output="sos")
    return signal.sosfilt(top_cut, np.array([mid + side, mid - side]))


dry = scene()
out = record(dry)
pcm_store(out)
```